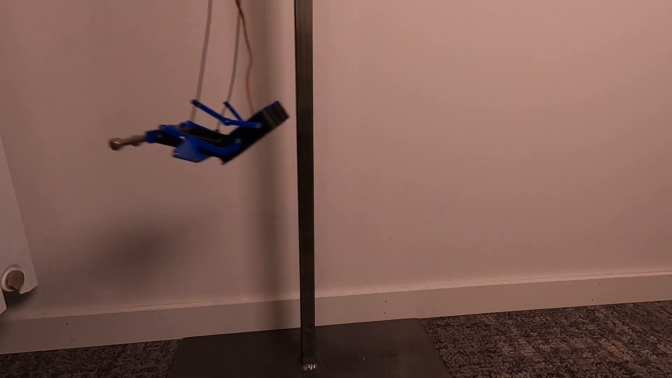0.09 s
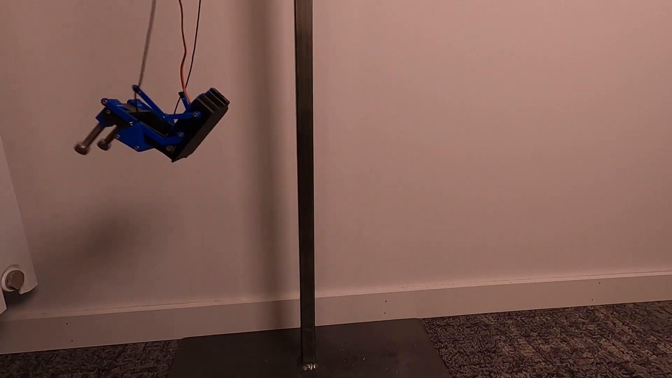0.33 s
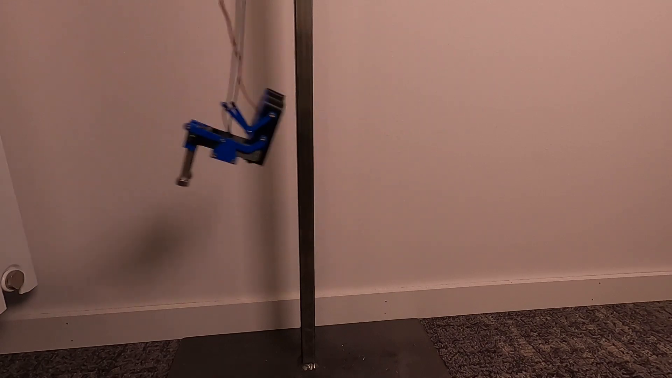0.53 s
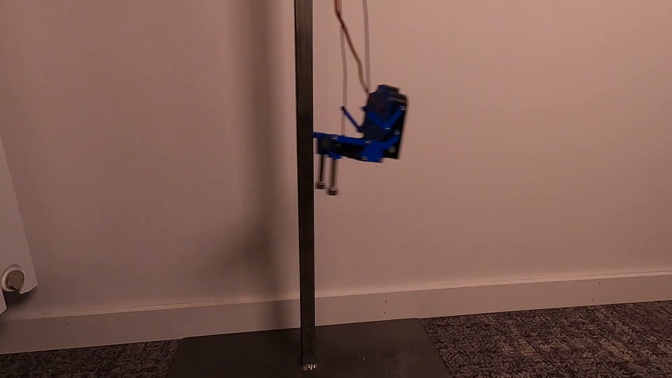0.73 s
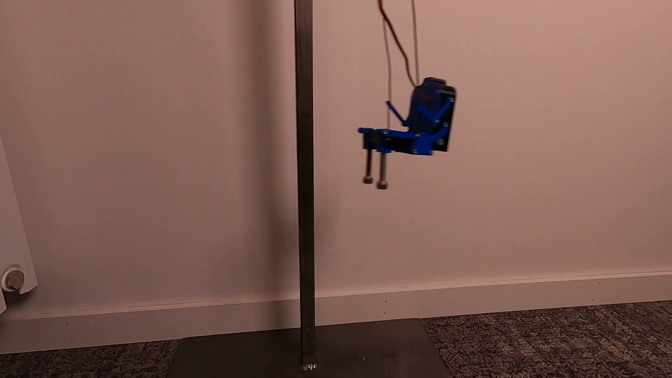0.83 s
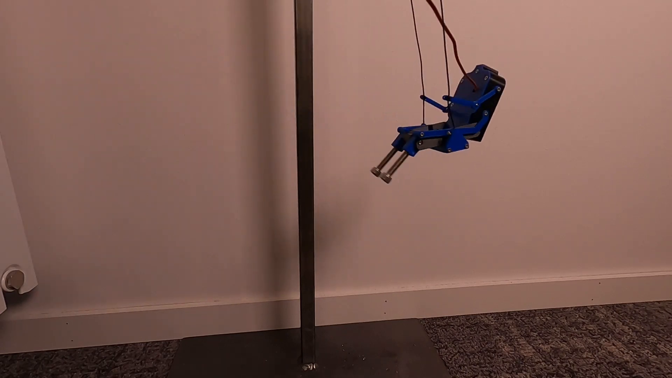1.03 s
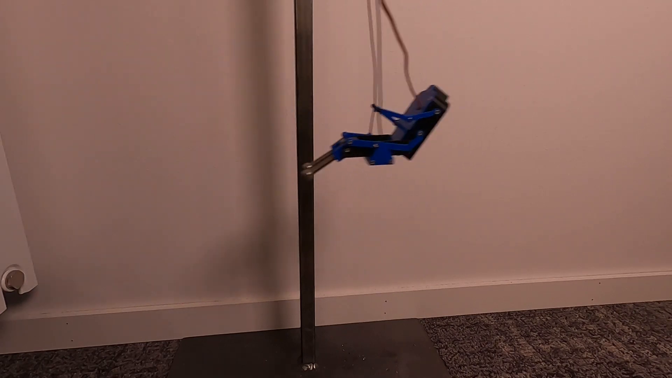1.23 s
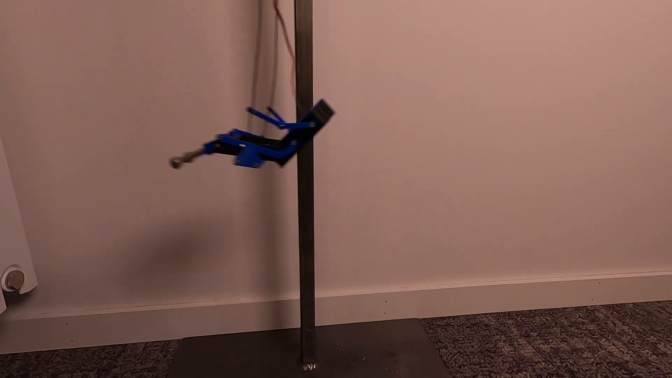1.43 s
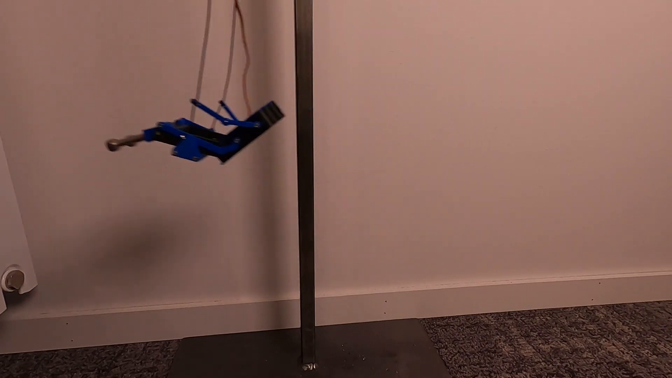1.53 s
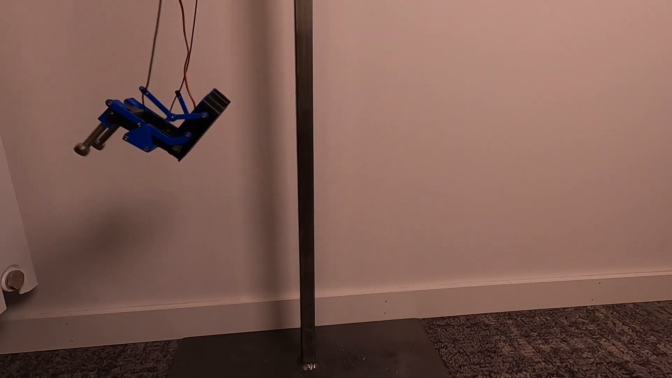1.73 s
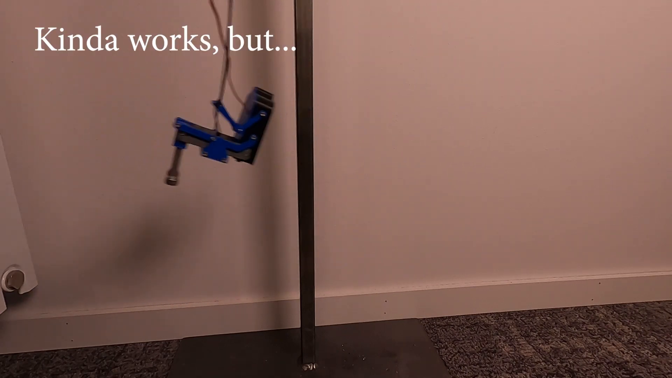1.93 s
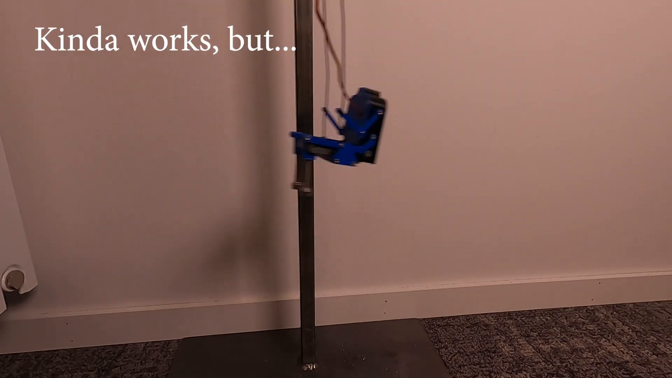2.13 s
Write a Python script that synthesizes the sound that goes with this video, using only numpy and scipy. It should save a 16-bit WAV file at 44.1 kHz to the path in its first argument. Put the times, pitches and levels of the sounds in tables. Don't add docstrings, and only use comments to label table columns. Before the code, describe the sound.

Three brief, raspy toy-motor whirrs with rattling plastic gears and faint ticks in a quiet room.

```python
import sys
import numpy as np
from scipy import signal
from scipy.io import wavfile
from scipy.ndimage import map_coordinates

SR = 44100
rng = np.random.default_rng(int(sys.argv[2]) if len(sys.argv) > 2 else 0)


def wav_record(signal):
    frames = np.transpose(np.atleast_2d(signal))
    bounded = np.clip(frames, -1, 1)
    quanta = np.round(bounded * 32767).astype(np.int16)
    wavfile.write(sys.argv[1], SR, quanta)


def ratio(d):
    e = np.asarray(d, float) / 20
    return 10 ** e


N = 97020


def rms_one(x):
    return x / np.sqrt(np.mean(x ** 2) + 1e-20)


def filtered(x, order, hz, kind):
    return signal.sosfilt(signal.butter(order, hz, kind, fs=SR, output="sos"), x)


def in_time(rows):
    s, *columns = np.transpose(rows)
    return [np.interp(np.arange(N) / SR, s, column) for column in columns]


def at_hz(points, hz):
    table = np.array(points)
    return np.interp(np.log(hz), np.log(table[:, 0]), table[:, 1])


def drift(rate_hz):
    r = np.exp(-2 * np.pi * rate_hz * 40 / SR)
    white = rng.standard_normal(N // 40 + 2002)
    slow = rms_one(signal.lfilter([1], [1, -2 * r, r * r], white)[2000:])
    return np.interp(np.arange(N) / 40, np.arange(len(slow)), slow)


def banded_noise(spectrum, patchy_db):
    # f/Hz, likeness [0 to 1]
    likeness = [(25, 1), (60, 0.89), (125, 0.97), (250, 0.164), (500, 0.28), (2000, 0.21), (10000, 0.098)]
    lowest, highest = spectrum[0][0], spectrum[-1][0]
    edges = 18 * 2 ** np.arange(0, 9.8, 1 / 3)
    white = rng.standard_normal((2, 2, N + SR))
    out = 0
    for k, (low, high) in enumerate(zip(edges, edges[1:])):
        hz = np.sqrt(low * high)
        if lowest <= hz <= highest:
            mid, side = filtered(white[k % 2], 2, [low, high], "band")[:, SR:]
            alike = np.clip(at_hz(likeness, hz), 0, 1)
            gain = ratio(at_hz(spectrum, hz) + patchy_db * drift(4.2))
            out = out + gain * (np.sqrt(1 + alike) * mid + np.sqrt(1 - alike) * side * [[1], [-1]])
    return rms_one(out)


def surges():
    # middle t/s, f/Hz, level/dB, length/ms
    swells = [(0.021, 78, -63, 18), (.13, 69.5, -60.5, 38), (.26, 71, -60, 22), (0.439, 71.5, -62, 35),
              (.6, 67, -59.5, 50), (.7, 74, -65, 22), (0.811, 71.4, -56.5, 16), (0.881, 71, -56.5, 32),
              (1.08, 64.5, -66, 54), (1.318, 67.6, -56, 27), (1.44, 59, -62, 40), (1.559, 56.6, -76, 27),
              (1.679, 66, -60.5, 42), (1.83, 62.5, -58, 40), (1.92, 75, -75, 20), (2.049, 76, -59.5, 29),
              (2.16, 83, -51, 11)]
    t = np.arange(N) / SR
    waver = np.cumsum(6.4 * drift(16.3)) / SR
    out = np.zeros(N)
    for s, hz, db, ms in swells:
        shape = np.exp(-((t - s) * 1000 / ms) ** 2)
        out += ratio(db + 2.5) * shape * np.sin(2 * np.pi * (hz * (t - s) + waver))
    return out


def rumble():
    # f/Hz, level/dB
    spectrum = [(20, -4.5), (30, 2), (45, -3), (70, 0.5), (120, -8.5), (165, -7), (250, -18), (390, -13.5),
                (700, -29.5)]
    low = banded_noise(spectrum, patchy_db=2.0) * ratio([[-.6], [.4]])
    deep = filtered(low, 4, 110, "low")
    rest = filtered(low, 4, 110, "high")
    return ratio(-61.5) * (rest + deep * ratio(-5.5)) + surges() * ratio([[.6], [-.6]])


def hiss():
    # f/Hz, level/dB
    spectrum = [(480, -10.5), (750, -10), (1150, -5.5), (1800, -4.5), (2600, -9), (5000, -13),
                (9500, -23.5), (14000, -44.5)]
    # t/s, level/dB
    swell = [(0.0, -4), (.15, 1), (.5, 13), (.75, 15), (.92, 11), (1.3, -4), (1.5, 2.5), (1.62, -1.5),
             (2.2, -4)]
    edge_hz = 977
    noise = ratio(-70) * banded_noise(spectrum, patchy_db=-0.5) * ratio([[.8], [-.8]])
    under = filtered(noise, 8, edge_hz, "low")
    wash = filtered(noise, 8, edge_hz, "high")
    return under + wash * ratio(in_time(swell)[0])


def room(x):
    t60_s, wall_cut_hz = 0.13, 15500
    out = np.zeros((2, N))
    dull = np.exp(-2 * np.pi * wall_cut_hz / SR)
    lags = (rng.uniform(.006, .03, 12) * SR).astype(int)
    for k, lag in enumerate(lags):
        loop, state = x.copy(), [0.]
        gain = ratio(-60 * lag / SR / t60_s)
        for i in range(lag, N, lag):
            back, state = signal.lfilter([gain * (1 - dull)], [1, -dull], loop[i - lag:i], zi=state)
            loop[i:i + lag] += back[:N - i]
        out[k % 2] += (loop - x) * (-1) ** (k // 2)
    return out


def tooth_contacts(per_s, spread_db):
    chance, size = rng.random(N), rng.exponential(1, N)
    sign = rng.choice([-1, 1, 1], N)
    hit = np.clip((per_s / SR - chance) * 50, 0, 1)
    return rms_one(hit * ratio(spread_db * np.minimum(size, 5)) * sign)


def kicks():
    # t/s, peak level/dB, length/ms, low body level/dB
    start_kicks = [
        (0.184, -48, 13, -2),
        (0.2054, -33.5, 4.6, -4.5),
        (0.2236, -31.5, 9.7, -3.5),
        (0.948, -32, 12, 0),
        (0.975, -37, 8.9, -24),
        (1.6264, -47.5, 11, -2),
        (1.648, -29.5, 3.3, -5),
        (1.668, -30, 8.2, 3.5),
    ]
    # middle t/s, peak level/dB, low body level/dB
    hold_kicks = [(0.528, -41.5, 2.5), (0.546, -44, -1), (0.567, -43.5, -8), (0.589, -48, -10),
                  (0.608, -55, -9), (0.627, -39.5, 3.5), (0.646, -46, -9), (0.667, -42, 1.5),
                  (0.685, -48.5, 1), (0.707, -52, -8), (0.728, -49, 4), (0.747, -41, -0.5),
                  (0.768, -44, 2.5), (0.787, -43, 5.5), (0.807, -44, -5), (0.827, -43, -8),
                  (0.846, -42.5, 0), (0.868, -41.5, 1), (0.888, -42.5, 2), (0.908, -43, 0)]
    # t/s, peak level/dB, length/ms, low body level/dB
    late_kicks = [(1.652, -38, 6.4, -3), (1.212, -41.5, 6.7, -9), (1.245, -42.5, 5.4, 3.5),
                  (1.269, -44, 3.9, -4), (1.2863, -42.5, 3.8, 1), (1.306, -50, 8.4, -18),
                  (1.325, -47, 3.3, 8.5), (1.3455, -44.5, 4.1, 4.5), (1.366, -45, 2.5, -6),
                  (1.37, -41, 2.3, -12), (1.312, -51, 2.5, -14), (1.393, -49, 3, -12),
                  (2.074, -47, 2.6, -10), (1.987, -53, 2.5, 8), (1.384, -47.5, 6.5, 2),
                  (1.9696, -39, 5.7, -10), (1.9892, -37, 6.5, -16), (2.0072, -42.5, 10.4, -4.5),
                  (2.028, -41.5, 8.3, -1), (2.0492, -44, 6.7, -24), (2.065, -50.5, 5.3, -4),
                  (2.0875, -40.5, 6.8, -3.5), (2.1077, -43, 4.2, -6), (2.1268, -42, 4.5, 1),
                  (2.148, -46.5, 3.5, -0.5), (2.168, -43, 5.1, -13), (2.1874, -42, 5.7, -3)]
    # t/s, peak level/dB, length/ms
    heavy_knocks = [(0.262, -25.5, 3.5), (.3485, -28, 3.8), (0.416, -22, 4), (0.99, -36, 3.5),
                    (1.004, -26, 2.7), (1.027, -24.5, 5.3), (1.037, -24, 2.8), (1.061, -37, 2.7),
                    (1.084, -24.5, 3.7), (1.136, -23.5, 5.7), (1.158, -34, 4), (1.717, -26, 4.5),
                    (1.756, -23.5, 3), (1.854, -23, 2.3)]
    knock_treble_db = -17
    events = [(*row, True, k in (1, 2, 6, 7)) for k, row in enumerate(start_kicks)]
    events += [(*row, True, False) for row in late_kicks]
    events += [(s, db, 2.0, body_db, False, False) for s, db, body_db in hold_kicks]
    events += [(s, db + 4 + knock_treble_db, ms, -knock_treble_db, True, False)
               for s, db, ms in heavy_knocks]

    t, teeth = np.arange(N) / SR, tooth_contacts(5000, 2.0)
    out = np.zeros((3, N))
    for s, db, ms, body_db, sudden, bright in events:
        age_ms = (t - s) * 1000
        shape = np.exp(-(age_ms / ms) ** 2)
        if sudden:
            shape = shape * (1 - np.exp(-np.maximum(age_ms, 0) / .25))
        cluster = shape * teeth
        even = np.sqrt(np.sum(shape ** 2) / np.sum(cluster ** 2))
        levels_db = [[db - 2.5], [db - 2.5 + 4.5 + body_db], [db - 32 + 21 * bright]]
        out += ratio(levels_db) * cluster * even
    return out


def gear_rattle(effort_db):
    t = np.arange(N) / SR
    pulse = 1 + .04 * np.cos(2 * np.pi * 50.0 * (t - .007))
    return ratio(effort_db + .5 * drift(22)) * pulse * tooth_contacts(8000, 1.8)


def resonate(x, hz, width_hz):
    r = np.exp(-np.pi * width_hz / SR)
    top = np.array([1, 0, -1]) * (1 - r * r) / 2
    return signal.lfilter(top, [1, -2 * r * np.cos(2 * np.pi * hz / SR), r * r], x + 1e-18)


def placed(x, left_db, lag):
    left = map_coordinates(x, [np.arange(N) - lag], order=3)
    return np.array([left * ratio(left_db / 2), x * ratio(-left_db / 2)])


def fine_scrape(rattle, slowness_db, snap):
    fast = (rattle * ratio(0.29 * slowness_db) + snap) * rng.choice([-1, 1], (3, N))
    air = filtered(fast[:2], 2, 11000, "high")
    scatter = filtered(fast[2], 2, [5000, 10000], "band")
    return ratio(-18) * air + ratio(-9) * scatter * [[1], [-1]]


def servo():
    # t/s, level/dB
    effort = [
        [(0.0, -84), (.18, -69.5), (.222, -48), (.245, -35), (.3, -33), (.45, -32.5), (.475, -36.5),
         (.505, -60), (.92, -70.5)],
        [(.945, -63), (.96, -41.5), (.99, -35), (1.03, -32), (1.165, -35), (1.205, -48.5), (1.26, -57.5),
         (1.39, -65), (1.42, -78)],
        [(1.62, -75), (1.665, -44), (1.69, -35), (1.76, -32.5), (1.87, -34), (1.91, -40), (1.95, -59),
         (2.05, -66), (2.2, -65)],
    ]
    # f/Hz, width/Hz, level/dB as turned to the listener in stroke 1, 2, 3
    case = [(957, 123, -20, -11.5, -19), (1346, 77, -5.5, -7.5, -7), (1613, 160, -4, -5, -4.5),
            (1846, 161, -0.5, -0.5, -0.5), (2685, 182, -8.5, -11, -10.5), (3230, 670, -10, -10, -10),
            (4403, 390, -12.5, -11, -11.5), (4868, 145, -2.5, -5.5, -0.5), (5423, 244, -9, -14.5, -11),
            (6210, 544, -7, -12, -6.5), (7800, 314, -9.5, -29.5, -8), (8454, 256, -2.5, -6.5, -3),
            (9050, 1800, -18, -15.5, -16.5), (12280, 650, -25.5, -34, -27)]
    lean = [-0.5, 2.5, 3, 3, 2, 5, 0, 7.5, -9, 6.5, -5.5, 1.5, 1.5, -6.5]
    # t/s, left level/dB, lag/samples
    swing = [(0.0, 1, 0.16), (.4, -0.3, -0.55), (.7, 5.5, 1), (1.05, -4, 0.67), (1.5, 1, 1),
             (1.8, -0.3, -0.5), (2.2, 0, 1)]
    # f/Hz, level/dB
    kick_colour = [(900, -9.5), (1800, -7), (3300, -1.5), (4900, -3), (6300, -5), (8300, -5.5),
                   (12000, -14.5)]

    t = np.arange(N) / SR
    effort_db, = in_time([point for stroke in effort for point in stroke])
    slowness_db = effort_db - effort_db.max()
    swing_db, swing_lag = in_time(swing)
    lag = 0.81 + swing_lag
    rattle = gear_rattle(effort_db)
    kick, body, snap = kicks()
    turns_s = [effort[0][-1][0], effort[1][0][0], effort[1][-1][0], effort[2][0][0]]
    out = 0
    for k, ((hz, width_hz, first, second, third), left_db) in enumerate(zip(case, lean)):
        turned_db = np.interp(t, turns_s, [first, second, second, third])
        dull_db = 0.07 * slowness_db * np.abs(np.log2(hz / 1700))
        flicker_db = 1.8 * (k > 0) * drift(21.7)
        blow = kick if k > 3 else body
        drive = rattle * ratio(dull_db + flicker_db) + blow * ratio(at_hz(kick_colour, hz))
        ringing = resonate(drive * ratio(turned_db + 13), hz, width_hz)
        ringing = resonate(ringing, hz, 6.7 * width_hz)
        out = out + (-1) ** k * placed(ringing, left_db + swing_db, lag)
    wide = filtered(rattle + kick * ratio(2.5), 3, [1500, 10500], "band")
    out = out + fine_scrape(rattle, slowness_db, snap)
    return out + ratio(-11) * placed(wide, swing_db, lag)


def scene():
    motor = filtered(servo(), 6, 827, "high")
    return motor + ratio(-11) * room(motor.mean(axis=0)) + rumble() + hiss()


def top_cut(x):
    return signal.sosfilt(signal.butter(12, 16370, fs=SR, output="sos"), x)


def record(dry):
    mix = signal.sosfilt(signal.cheby2(12, 70, 16300, fs=SR, output="sos"), dry)
    return top_cut(mix)


dry = scene()
out = record(dry)
wav_record(out)
```